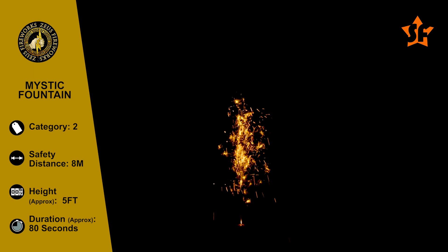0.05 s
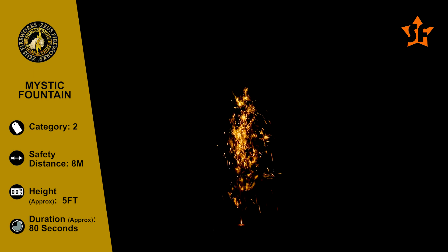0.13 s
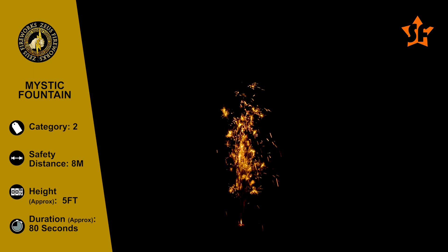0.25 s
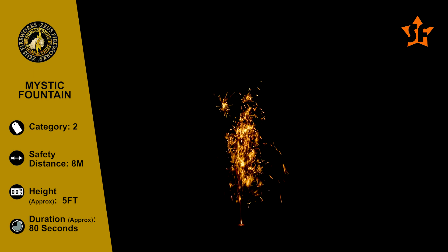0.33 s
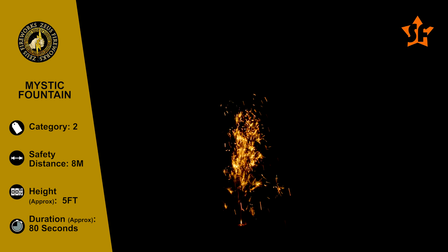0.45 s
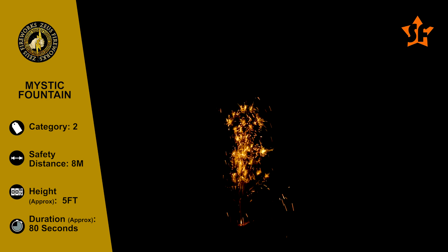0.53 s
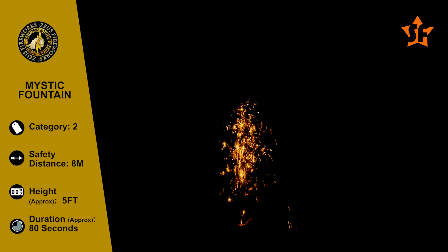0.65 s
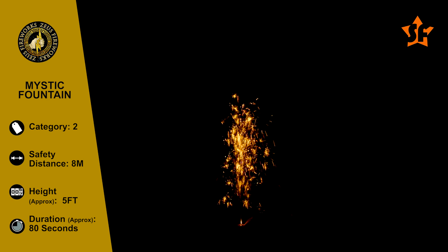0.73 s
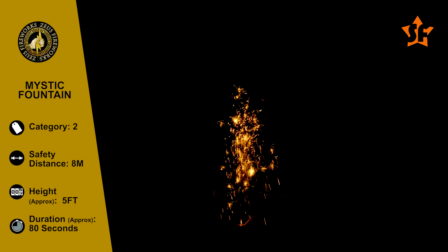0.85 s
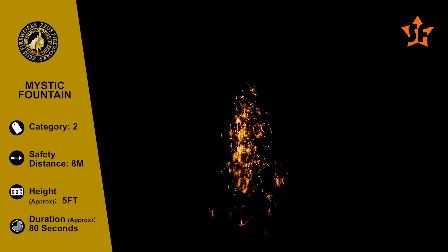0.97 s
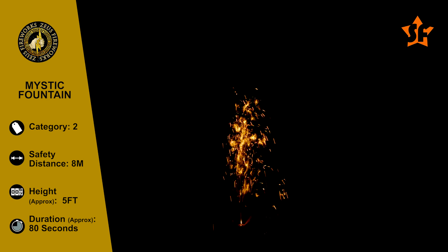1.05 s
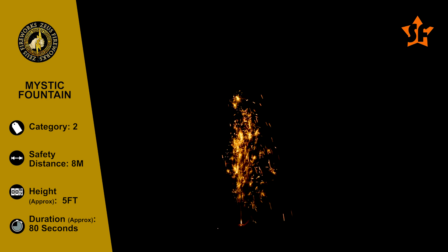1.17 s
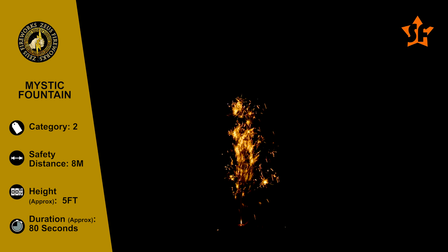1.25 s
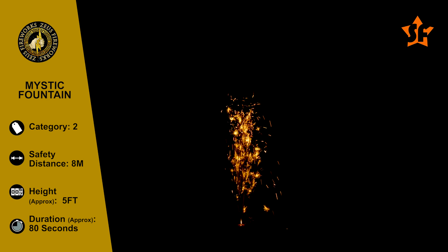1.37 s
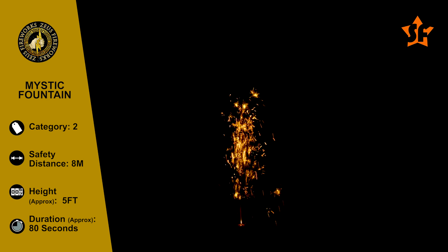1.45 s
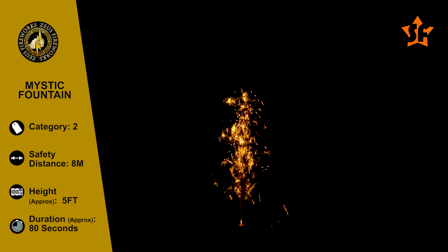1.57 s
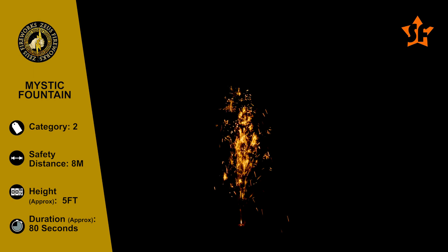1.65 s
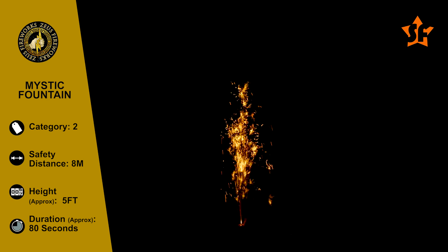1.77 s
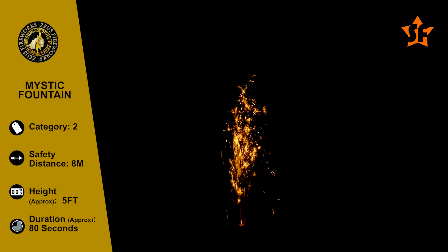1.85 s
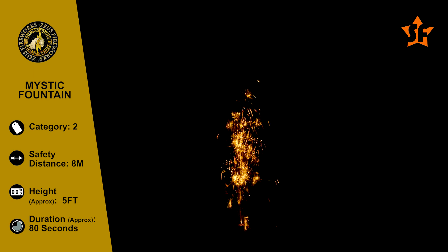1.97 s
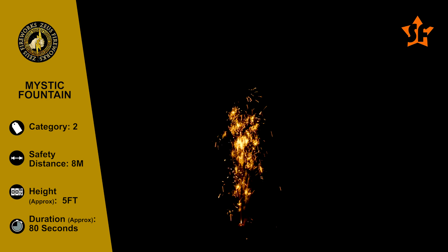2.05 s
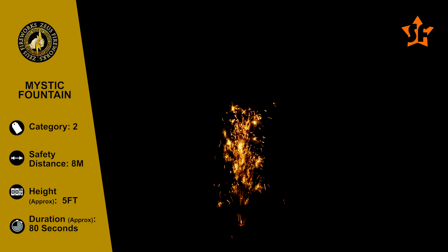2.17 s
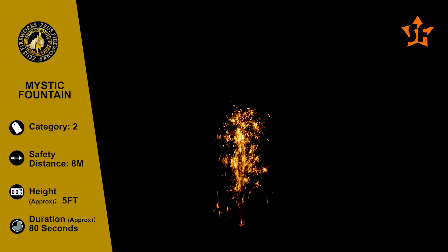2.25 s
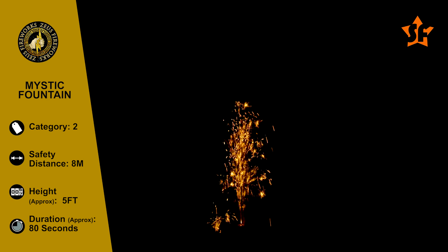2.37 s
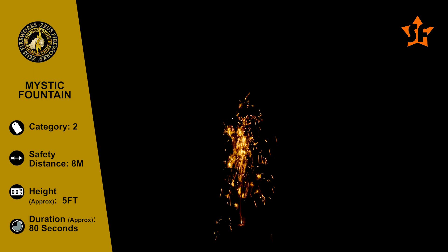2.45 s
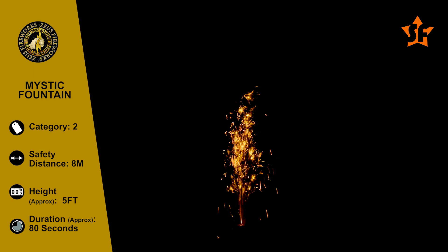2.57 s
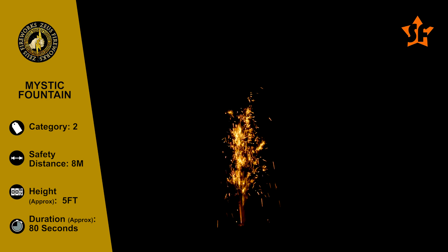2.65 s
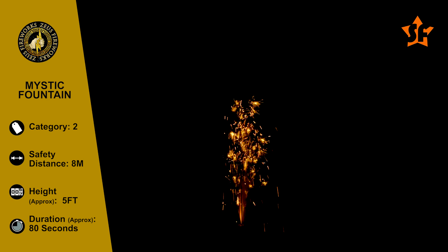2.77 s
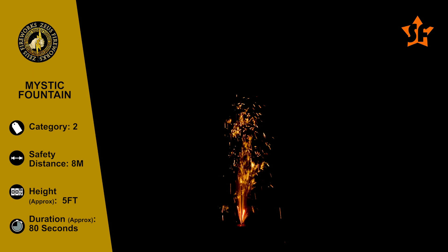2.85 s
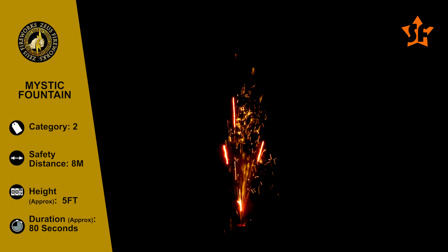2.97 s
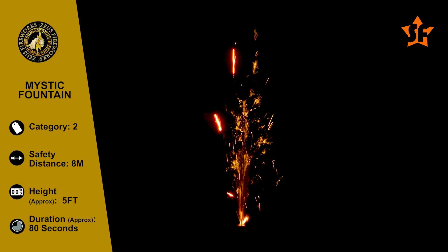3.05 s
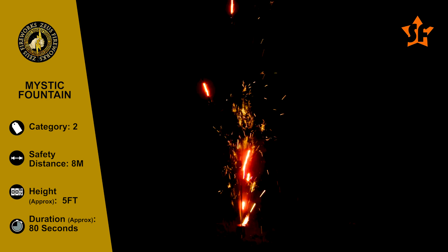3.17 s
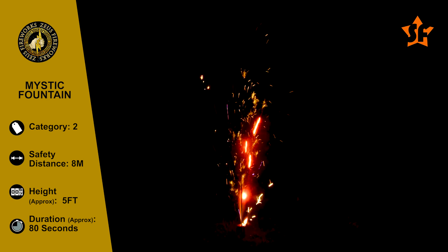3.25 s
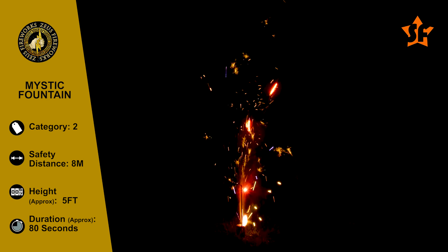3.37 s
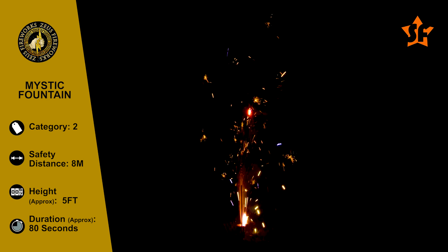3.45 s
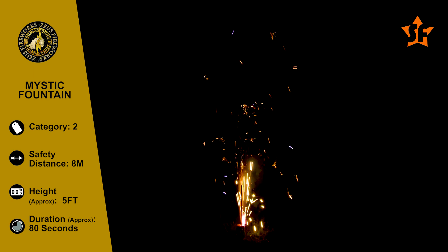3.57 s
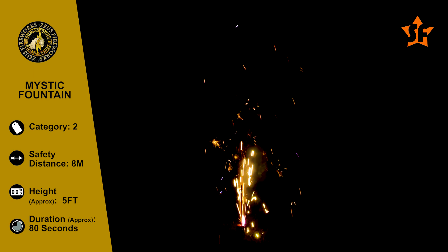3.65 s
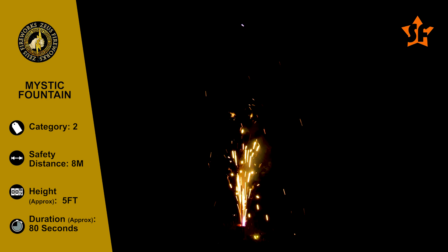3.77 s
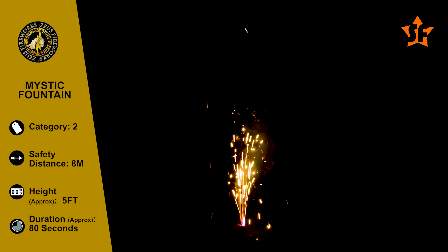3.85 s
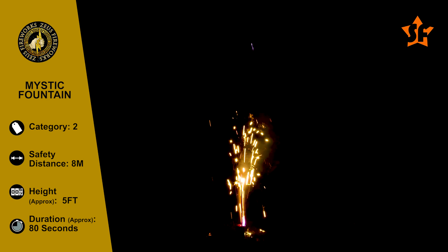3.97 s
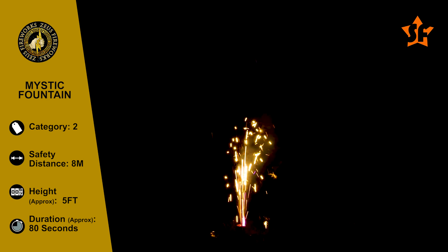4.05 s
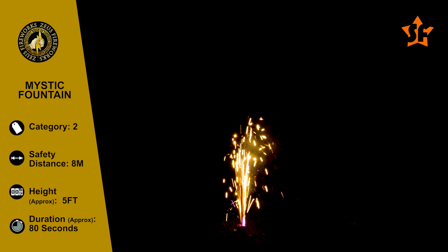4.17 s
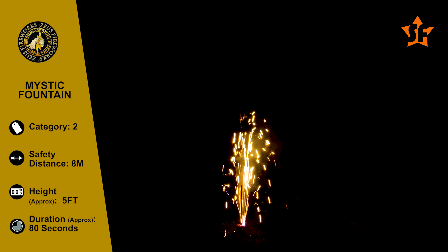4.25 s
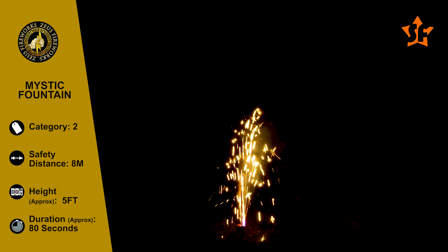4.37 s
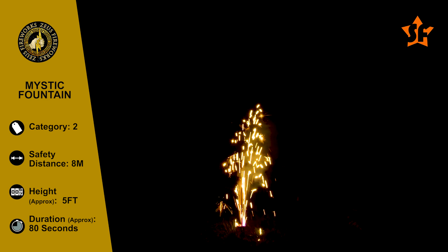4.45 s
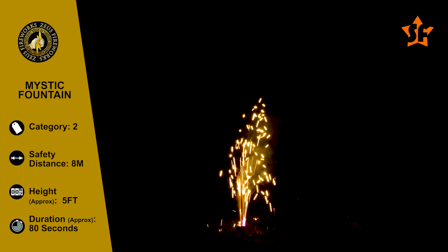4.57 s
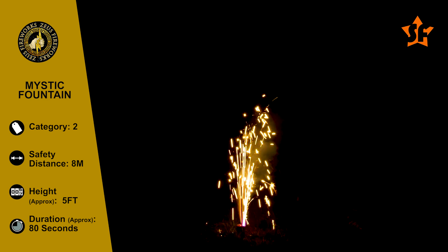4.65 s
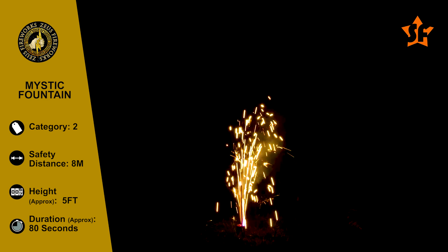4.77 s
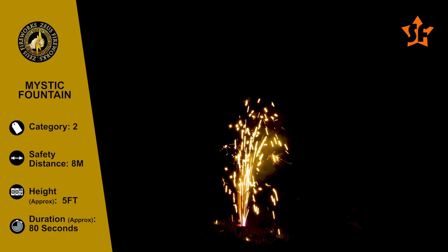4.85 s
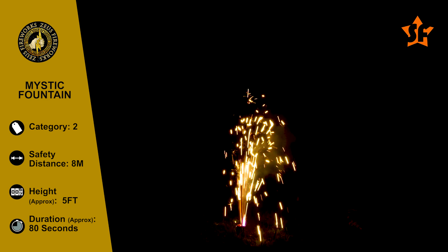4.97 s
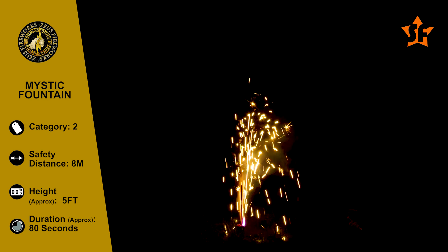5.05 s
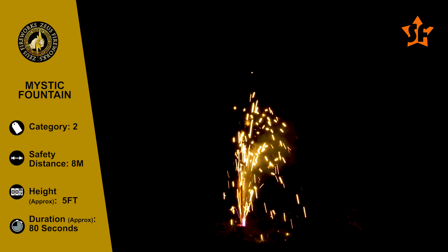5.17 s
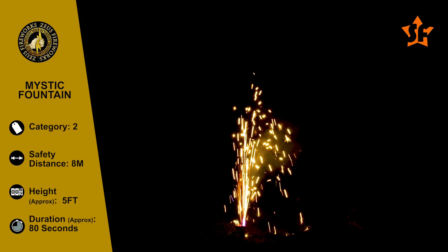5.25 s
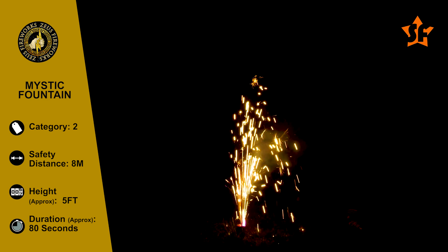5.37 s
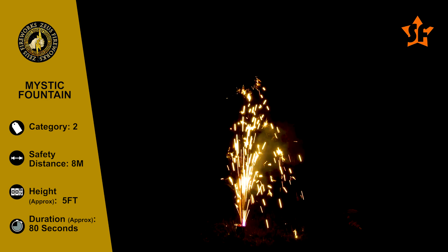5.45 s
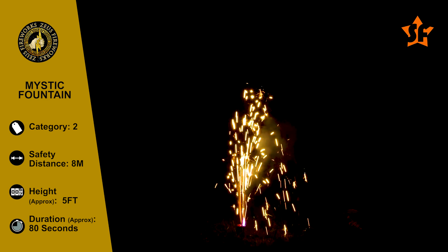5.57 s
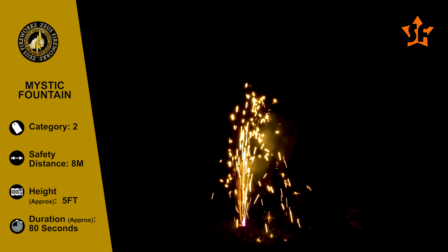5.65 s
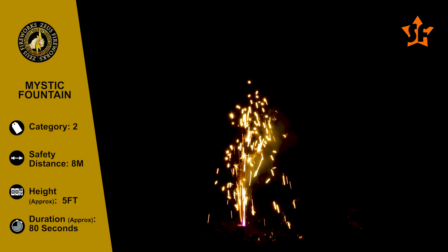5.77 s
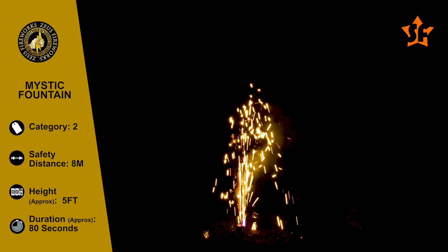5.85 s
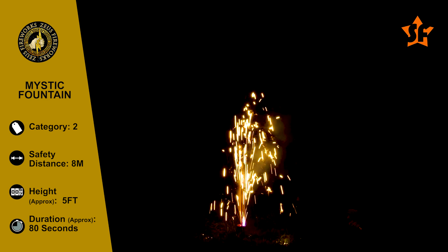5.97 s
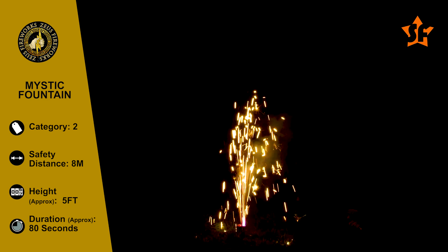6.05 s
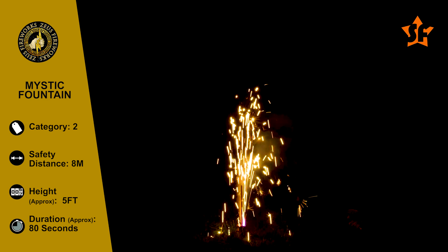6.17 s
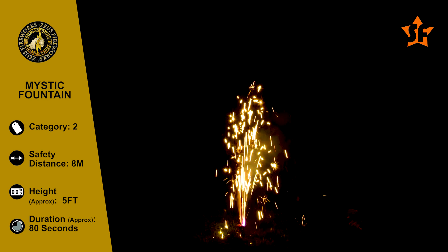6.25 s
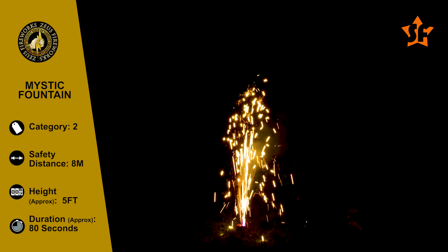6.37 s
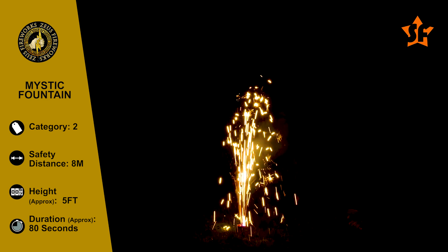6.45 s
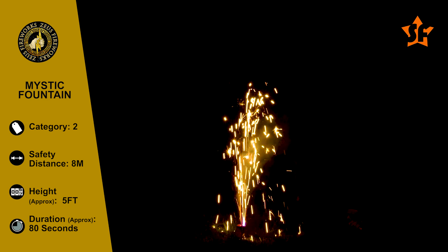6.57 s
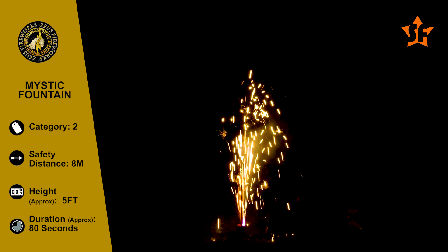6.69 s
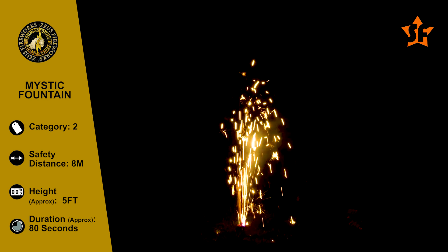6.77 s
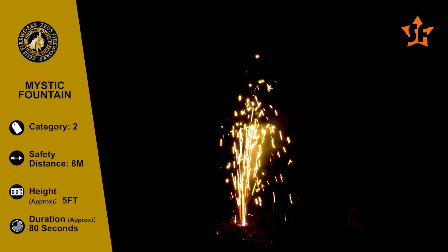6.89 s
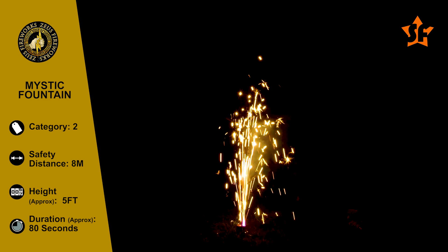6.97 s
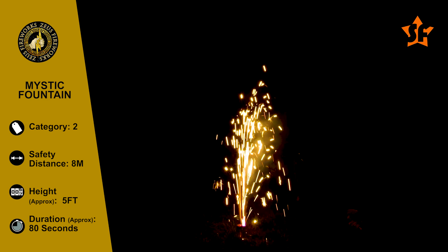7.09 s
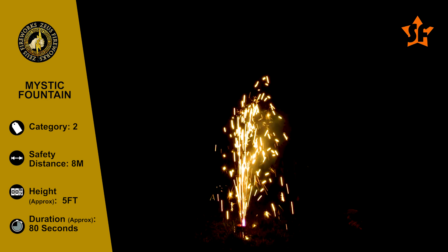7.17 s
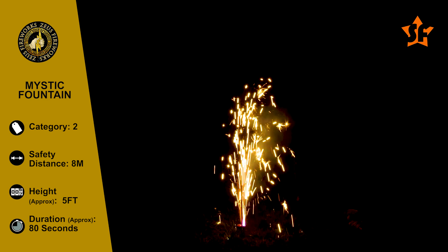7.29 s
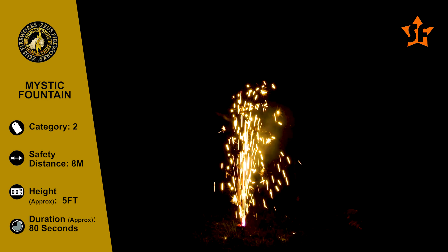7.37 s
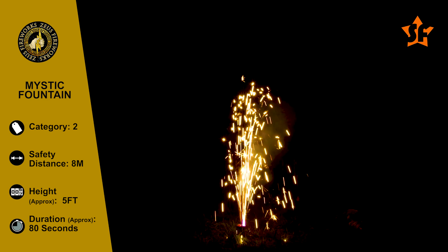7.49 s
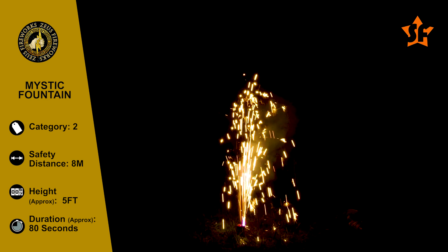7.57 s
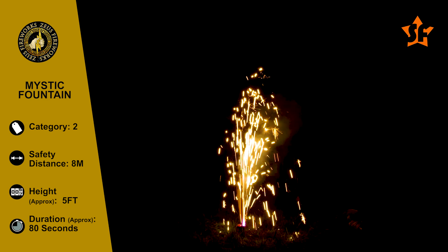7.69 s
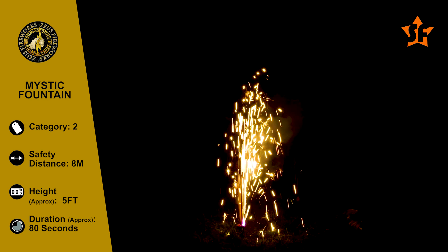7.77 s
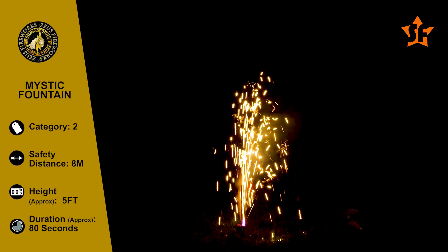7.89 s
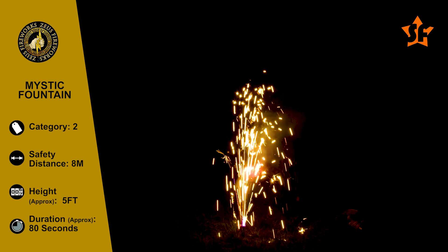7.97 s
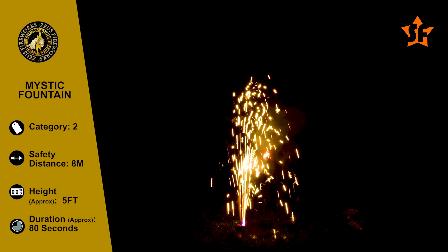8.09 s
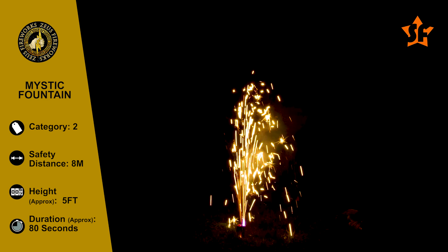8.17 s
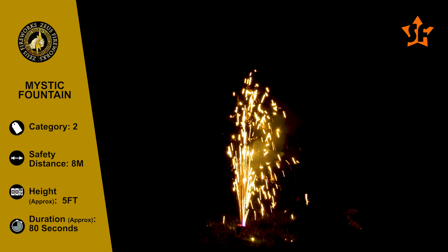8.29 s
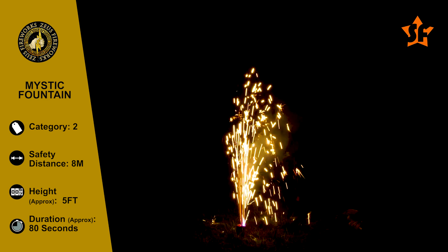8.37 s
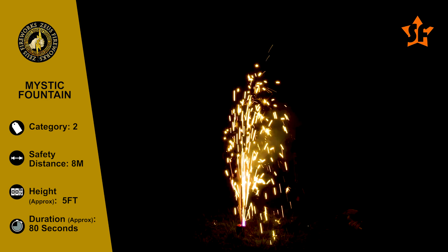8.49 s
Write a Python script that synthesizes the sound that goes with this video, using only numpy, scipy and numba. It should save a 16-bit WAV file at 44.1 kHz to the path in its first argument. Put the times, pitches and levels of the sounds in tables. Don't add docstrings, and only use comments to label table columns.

```python
import sys
import numpy as np
from scipy import signal
from scipy.fft import rfft, irfft, next_fast_len
from scipy.io import wavfile
from scipy.ndimage import uniform_filter1d
from numba import njit

SR = 44100
rng = np.random.default_rng(int(sys.argv[2]) if len(sys.argv) > 2 else 0)


def amplitude_ratio(level_db):
    exponent = np.asarray(level_db, float) / 20
    return 10 ** exponent


def pcm_store(signal):
    levels = np.round(np.clip(np.atleast_2d(signal), -1, 1) * 32767)
    wavfile.write(sys.argv[1], SR, levels.astype(np.int16).T)


N = 376173


def rms_one(x):
    return x / np.sqrt(np.mean(x ** 2) + 1e-20)


def in_time(rows):
    s, *columns = np.transpose(rows)
    return [np.interp(np.arange(N) / SR, s, c) for c in columns]


def drift(rate):
    r = np.exp(-80 * np.pi * rate / SR)
    noise = rng.standard_normal(N // 40 + 2002)
    slow = signal.lfilter([1], [1, -2 * r, r * r], noise)[2000:]
    return np.interp(np.arange(N) / 40, np.arange(len(slow)), rms_one(slow))


def swell(peak_s, rise_s, fall_s):
    return np.interp(np.arange(N) / SR, [peak_s - rise_s, peak_s, peak_s + fall_s], [0, 1, 0])


def step_up(start_s, takes_s):
    return np.clip((np.arange(N) / SR - start_s) / takes_s, 0, 1)


def band(x, low, high):
    return signal.sosfilt(signal.butter(2, [low, min(high, .45 * SR)], "band", fs=SR, output="sos"), x)


def turbulence(spectrum, own_db, shared_db, rate, tilt_db=0):
    hz, level = np.transpose(spectrum)
    edges = np.geomspace(hz[0], hz[-1], int(4 * np.log2(hz[-1] / hz[0])) + 2)
    white = rng.standard_normal((2, N))
    together = shared_db * drift(rate)
    out, power = 0, 0
    for k, (low, high) in enumerate(zip(edges, edges[1:])):
        mid = np.sqrt(low * high)
        gain = amplitude_ratio(np.interp(np.log(mid), np.log(hz), level) + tilt_db * np.log2(mid / 2500))
        power = power + gain ** 2 * (high - low) * 2.2 / SR
        flicker = amplitude_ratio(together + own_db * drift(rate))
        out = out + gain * flicker * band(white[k % 2], low, high)
    return out / np.sqrt(power)


@njit
def sweep(x, turn, r):
    y = np.zeros(len(x))
    for i in range(2, len(x)):
        y[i] = (1 - r) * x[i] + r * turn[i] * y[i - 1] - r * r * y[i - 2]
    return y


def nozzle_tone(rows, width_hz, waver, flutter_db):
    hz, level_db = in_time(rows)
    turn = 2 * np.cos(2 * np.pi * hz * (1 + waver * drift(11.3)) / SR)
    r = np.exp(-np.pi * width_hz / SR)
    tone = sweep(sweep(rng.standard_normal(N), turn, r), turn, r)
    loudness = np.sqrt(uniform_filter1d(tone ** 2, size=8000) + 1e-12)
    return tone / loudness * amplitude_ratio(level_db + flutter_db * drift(8.6))


def pushes(rows, cycles):
    out, t = np.zeros(N), np.arange(3000) / SR
    for s, peak_db, hz in rows:
        at = round(s * SR)
        out[at:at + len(t)] -= amplitude_ratio(peak_db - 0.5) * np.sin(2 * np.pi * hz * t) * np.exp(-hz * t / cycles)
    return out


def flame_surges():
    # surge_s, lift_db, length_s
    surges = [(0.446, 1.5, 0.15), (0.98, 1, 0.096), (2.59, 0, 0.033), (2.752, -2.5, 0.02),
              (2.901, 5, 0.044), (3.034, -0.5, .04), (3.095, 3.5, 0.03), (3.95, 1.5, 0.041),
              (6.327, 1.5, .1), (6.587, 2.5, 0.059), (7.188, -1.5, 0.13)]
    attack_s = 0.0086
    lift_db = 0
    for s, db, long_s in surges:
        hump = np.minimum(1.14 * swell(s, attack_s + 0.87 * long_s, long_s), 1)
        lift_db = lift_db + db * hump
    return lift_db


def gas_jet(jet_db, dust_db, surge_db):
    # pitch_hz, level_db (per Hz)
    hiss = [(400, -14.5), (600, -12.5), (740, -16), (850, -9), (1130, -9), (1260, -6), (1600, -3.5),
            (2050, -1.5), (2620, -1.5), (2850, -5), (5000, -5.5), (5600, -8.5), (6400, -8.5), (8300, -22)]
    tilt_db = 0.6 + 0.28 * (dust_db + 36.5) + 0.04 * (jet_db + 24)
    jet = turbulence(hiss, own_db=0.8, shared_db=0.3, rate=22, tilt_db=tilt_db)
    jet = amplitude_ratio(jet_db + surge_db + 0.3) * jet
    return signal.sosfilt(signal.butter(10, 6450, fs=SR, output="sos"), jet)


def dust_spray(jet_db, dust_db, surge_db):
    # pitch_hz, level_db (per Hz)
    fizz = [(6000, -14), (7000, -5), (8000, 3), (9500, -0.5), (11000, 0), (12500, -3.5), (14000, -2),
            (16500, -7)]
    tilt_db = -.35 * (jet_db + 36) + 2 * step_up(start_s=5.2, takes_s=2.5)
    clumps_db = 0.3 * drift(5.2)
    level_db = dust_db + 1.2 * surge_db + clumps_db + 0.9
    return amplitude_ratio(level_db) * turbulence(fizz, own_db=0.8, shared_db=0.5, rate=50, tilt_db=tilt_db)


def flame_roar(surge_db):
    # pitch_hz, level_db (per Hz)
    rumble = [(60, -30), (95, -6), (140, -1), (215, -7), (285, 0), (345, -4), (420, 1), (540, -7),
              (700, -11), (1000, -13), (1500, -17), (2200, -35)]
    change_s, takes_s = 2.54, 0.18
    first_db, second_db = -44, -39
    second = step_up(change_s - takes_s / 2, takes_s)
    flare_db = 6 * swell(peak_s=3.61, rise_s=0.31, fall_s=0.31)
    roar_db = first_db + (second_db - first_db) * second + flare_db
    return amplitude_ratio(roar_db + 1.7 * surge_db) * turbulence(rumble, own_db=2.0, shared_db=0.0, rate=13.3)


def whistles():
    # time_s, pitch_hz, level_db
    first = [
        (0, 7460, -40),
        (.4, 7700, -39.5),
        (1.45, 7340, -40),
        (1.75, 6760, -34),
        (2.1, 5980, -35),
        (2.5, 6100, -36),
        (2.7, 6000, -60),
    ]
    # time_s, pitch_hz, level_db
    second = [(4.0, 5000, -60), (5.75, 5000, -37), (6, 6000, -38), (6.6, 5900, -41), (6.65, 5050, -35.5),
              (6.93, 6100, -34.5), (7.48, 5700, -35), (7.65, 6000, -36), (7.85, 5450, -36),
              (8.1, 5800, -39), (8.53, 6000, -36)]
    narrow = nozzle_tone(second, width_hz=400, waver=.017, flutter_db=2.2)
    broad = nozzle_tone(first, width_hz=800, waver=.025, flutter_db=2.2)
    return narrow + broad


def tube_throat():
    # time_s, pitch_hz, level_db
    ring = [(0, 3150, -30), (.5, 3460, -39.5), (2.5, 3180, -32), (2.8, 2880, -75), (3.6, 1840, -35),
            (4.2, 2420, -29), (4.8, 2710, -28), (5.45, 3150, -27), (5.7, 2790, -30), (7.1, 2980, -32.5),
            (7.6, 2760, -33.5), (8.53, 2800, -30)]
    return nozzle_tone(ring, width_hz=900, waver=.04, flutter_db=1.5)


def wind():
    # peak_s, level_db, length_s
    gusts = [(.05, -47, .15), (0.417, -45, 0.22), (1.0, -35.5, 0.27), (1.195, -33, 0.13),
             (1.735, -39.5, 0.26), (2.21, -41.5, 0.5), (2.9, -46, .3), (3.12, -44, 0.32), (4.6, -43, .3),
             (5, -42, .12), (5.69, -50, .25), (5.95, -47, .2), (6.178, -35, .3), (7.63, -44, 0.14),
             (8.53, -41, .25)]
    # pitch_hz, level_db (per Hz)
    rumble = [(22, -30), (38, 11.5), (50, -0.5), (70, 8.5), (110, -3.5), (160, -0.5), (240, -22.5)]
    # start_s, peak_db, pitch_hz
    eddies = [(0.908, -25, 113), (0.928, -28, 51.1), (0.994, -22, 91.5), (1.011, -20, 72.7),
              (1.06, -23, 137), (1.089, -28, 59.2), (1.164, -22, 72.7), (1.203, -23, 64.6),
              (1.66, -30, 72.7), (1.738, -30, 75.4), (1.78, -33, 56.5), (2.109, -30, 45.8), (2.2, -38, 150),
              (2.29, -27, 70.0), (5.011, -21, 91.5), (5.698, -29, 40.4), (6.105, -34, 53.8),
              (6.169, -28, 45.8), (6.239, -37, 64.6), (7.599, -38, 51.1)]
    calm_db, rise_share = -52.5, .6
    humps = [(db - calm_db) * swell(s, rise_share * long_s, long_s) for s, db, long_s in gusts]
    lift_db = np.max(humps, axis=0)
    thumps = amplitude_ratio(5.0) * pushes(eddies, cycles=.45)
    return amplitude_ratio(calm_db + lift_db) * turbulence(rumble, own_db=-0.8, shared_db=4.0, rate=22.0) + thumps


def choked_sputter(surge_db):
    # pitch_hz, level_db (per Hz)
    rush = [(450, -4), (900, 3.5), (1500, 0.5), (3000, -2), (5500, 2), (7500, -12)]
    choked = np.minimum(2 * swell(peak_s=3.34, rise_s=0.93, fall_s=0.64), 1)
    catch_db = 6 * np.minimum(2 * swell(peak_s=3.55, rise_s=0.1, fall_s=.5), 1)
    level_db = -37.5 + 1.3 * surge_db + catch_db
    return choked * amplitude_ratio(level_db) * turbulence(rush, own_db=1.5, shared_db=1.5, rate=27)


def coughs():
    # start_s, peak_db, pitch_hz
    bursts = [(2.556, -18.5, 273), (2.685, -16.5, 428), (2.778, -23, 125), (2.883, -17, 118),
              (2.897, -23, 288), (2.929, -18, 398), (3.141, -23, 170), (3.176, -18, 136),
              (3.224, -22, 75.4), (3.383, -14, 313), (3.494, -27, 439), (3.564, -19, 428),
              (3.755, -13, 404)]
    return pushes(bursts, cycles=0.53)


def sparks(jet_db):
    # start_s, level_db (of the trough)
    snaps = [(3.8959, -8), (3.9507, -11), (4.2532, -12), (4.2593, -6), (4.322, -10), (4.3885, -8),
             (4.4719, -8), (4.5414, -8), (4.5844, -5), (4.6199, -7), (4.6992, -5), (5.0006, -7),
             (5.0307, -6), (5.0502, -5), (5.1083, -8), (5.228, -4), (5.6046, -4), (5.8095, -4),
             (5.9969, -5), (6.3346, -5), (6.3444, -4), (6.6812, -5), (7.085, -5), (7.3577, -4),
             (7.3612, -4), (7.6584, -5), (7.7154, -4), (7.7305, -3), (7.8336, -5), (8.2949, -4)]
    s, level_db = np.transpose(snaps)
    clicks = np.zeros(N)
    clicks[np.round(s * SR).astype(int)] = amplitude_ratio(level_db - .5)
    chance = 25 / SR * step_up(start_s=4.4, takes_s=1.2)
    shower = (rng.random(N) < chance) * amplitude_ratio(-10 + 4.5 * rng.uniform(-1, 1, N))
    relit = np.arange(N) / SR > 3.85
    faint_db = jet_db + 3.5 + 2.1 * np.minimum(rng.exponential(1, N), 3)
    faint = (rng.random(N) < 120 / SR) * relit * amplitude_ratio(faint_db)
    t = np.arange(-3, 60) / SR
    trough = 1.3 * np.exp(-(t / 1.7e-5) ** 2)
    late = np.maximum(t - 2.5e-5, 0) / 4.4e-5
    rebound = 1.75 * late ** 2 * np.exp(-late) - .2 * np.exp(-t / 5.7e-4) * (t > 0)
    return signal.fftconvolve(clicks + shower + faint, rebound - trough)[3:N + 3]


def pops():
    # start_s, peak_db, pitch_hz
    stars = [
        (6.331, -13, 1030),
        (6.641, -15, 1080),
        (8.094, -10.5, 467),
    ]
    return pushes(stars, cycles=0.53)


def bounces(x):
    # delay_ms, gain (plain factor)
    echoes = [(0.718, -0.019), (0.97, 0.023), (1.024, 0.038), (1.066, -0.023), (1.165, -0.032),
              (1.255, -0.033), (1.309, -0.022), (1.444, -0.027), (1.594, 0.028), (1.963, -0.022),
              (2.014, -0.025), (2.128, -0.024), (2.521, 0.018), (3.97, 0.045), (4.03, -0.029),
              (4.141, -0.027), (4.414, -0.016), (4.513, 0.028), (4.69, 0.023), (4.735, -0.024),
              (4.819, 0.03), (5.068, -0.039), (7.018, -0.017), (10.105, 0.016)]
    size = next_fast_len(N + 2000)
    hz = np.arange(size // 2 + 1) * SR / size
    early = 1 + 1.5 * sum(g * np.exp(-2j * np.pi * hz * ms / 1000) for ms, g in echoes)
    t = np.arange(1500) / SR
    scatter = .010 * rng.standard_normal(len(t)) * np.exp(-t / .012) * (t > .003)
    return irfft(rfft(x, size) * (early + rfft(scatter, size)), size)[:N]


def scene():
    # time_s, jet_db (gas pressure), dust_db (load of metal dust)
    burn = [(0, -21.5, -35), (1.5, -22, -36.5), (2.35, -23, -36.5), (2.52, -24, -39), (2.74, -28.5, -38),
            (2.96, -31, -34), (3.19, -38, -42.5), (3.32, -30, -38.5), (3.46, -32, -41.5),
            (3.58, -28.5, -43), (3.75, -24, -37), (3.9, -25, -39.5), (4.3, -25.5, -45), (4.75, -23, -39),
            (5.2, -22, -40), (5.65, -22.5, -36), (7.5, -22.5, -37), (8.53, -21.5, -35)]
    jet_db, dust_db = in_time(burn)
    surge_db = flame_surges()
    fountain = gas_jet(jet_db, dust_db, surge_db) + dust_spray(jet_db, dust_db, surge_db)
    fountain = fountain + flame_roar(surge_db) + whistles() + tube_throat()
    fountain = fountain + choked_sputter(surge_db) + coughs()
    fountain = fountain + sparks(jet_db) + pops()
    mono = bounces(fountain) + wind()
    return np.array([mono, mono])


def noise_fill(mono):
    patches = [.237, .424, .646, .948, 1.039, 1.328, 1.7, 1.7, 1.898, 1.898, 1.992, 1.992, 1.992, 2.117,
               2.117, 2.293, 2.293, 2.49, 2.49, 2.943, 2.943, 3.2, 3.2, 3.49, 5.474, 6.147, 6.391, 7.785,
               7.785]
    side, fade = np.zeros(N), signal.windows.tukey(1600, .7)
    hz = np.fft.rfftfreq(len(fade), 1 / SR)
    lows = rng.permutation(np.linspace(4400, 14200, len(patches)))
    for s, low in zip(patches, lows):
        at = slice(round(s * SR) - 800, round(s * SR) + 800)
        inside = (hz > low) & (hz < low + 1600)
        level = np.std(irfft(rfft(mono[at]) * inside))
        hiss = rms_one(irfft(rfft(rng.standard_normal(len(fade))) * inside))
        side[at] += amplitude_ratio(-4.5) * level * fade * hiss
    return side


def top_cut(x):
    return signal.sosfilt(signal.butter(12, 16890, fs=SR, output="sos"), x)


def record(dry):
    wide = dry + noise_fill(dry[0]) * [[1], [-1]]
    wide = signal.sosfilt(signal.butter(2, 36, "high", fs=SR, output="sos"), wide)
    wide = irfft(rfft(wide) * (np.fft.rfftfreq(N, 1 / SR) < 15830), N)
    return top_cut(wide)


dry = scene()
out = record(dry)
pcm_store(out)
```